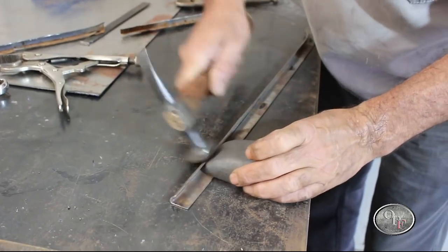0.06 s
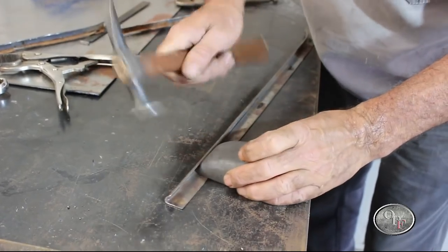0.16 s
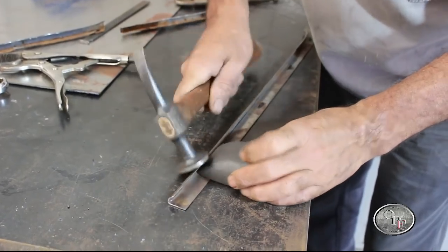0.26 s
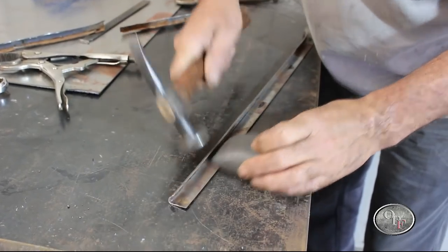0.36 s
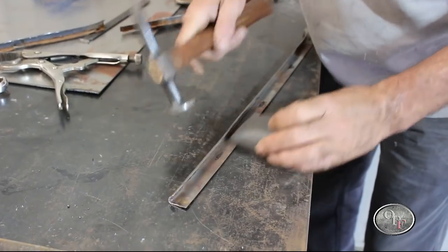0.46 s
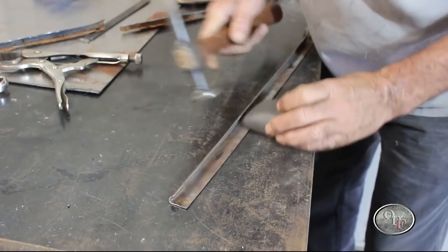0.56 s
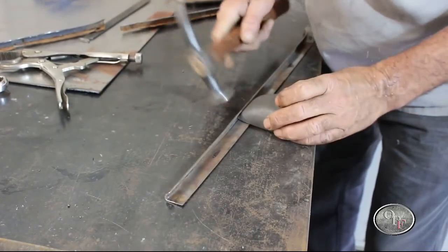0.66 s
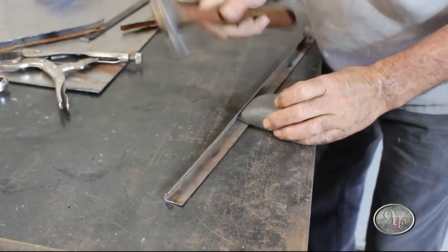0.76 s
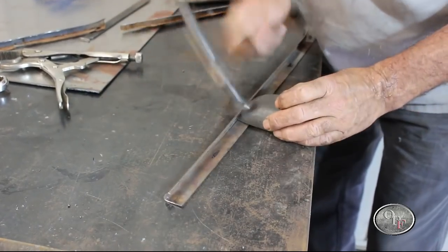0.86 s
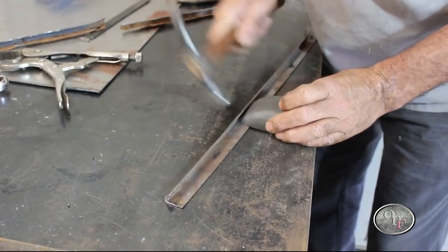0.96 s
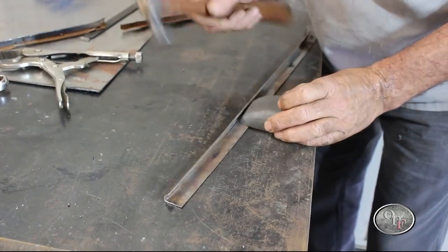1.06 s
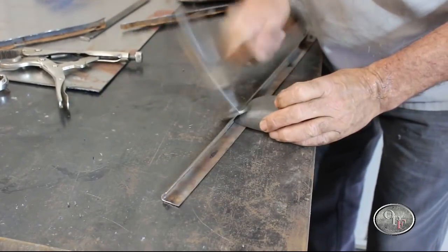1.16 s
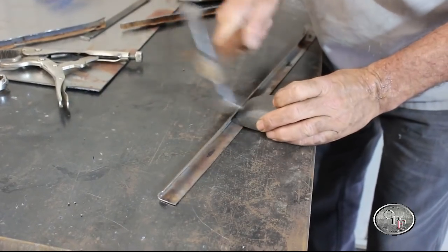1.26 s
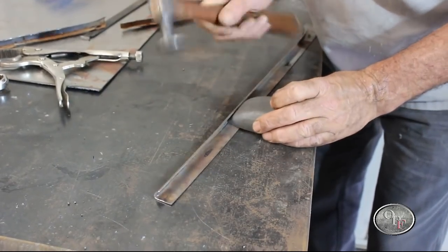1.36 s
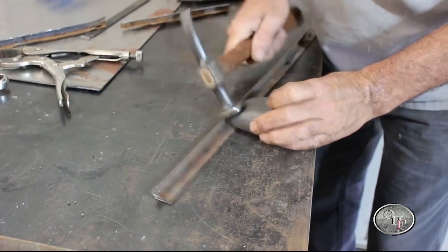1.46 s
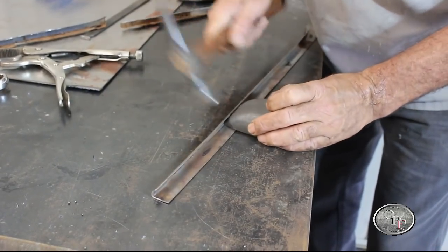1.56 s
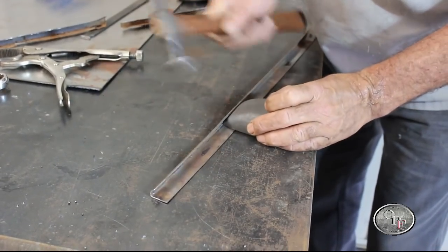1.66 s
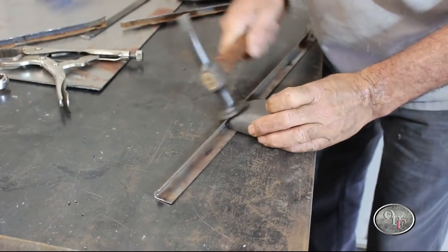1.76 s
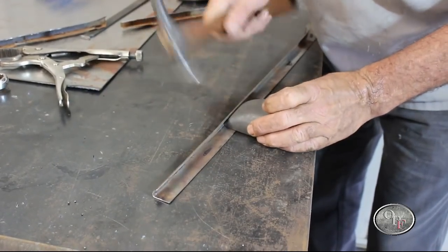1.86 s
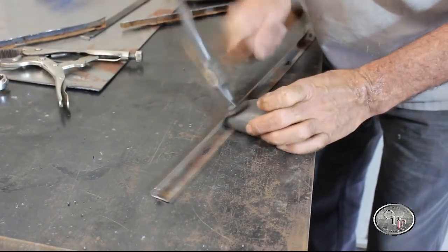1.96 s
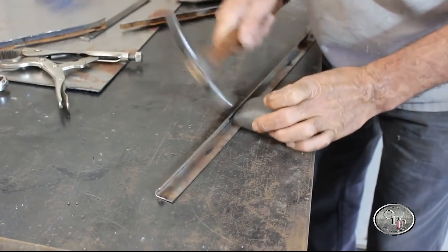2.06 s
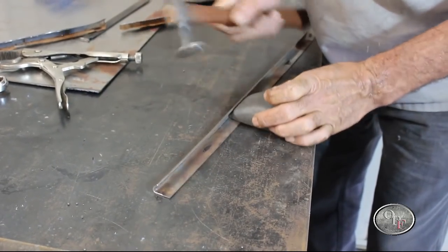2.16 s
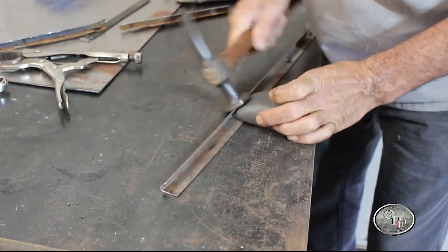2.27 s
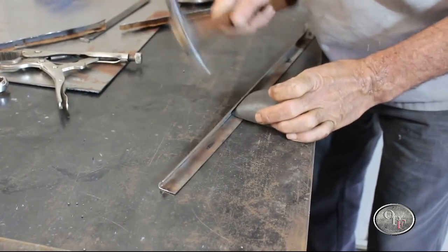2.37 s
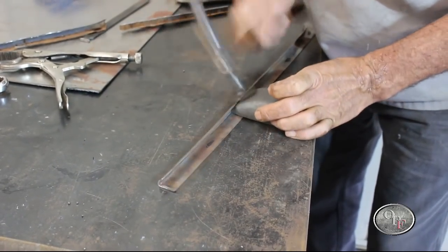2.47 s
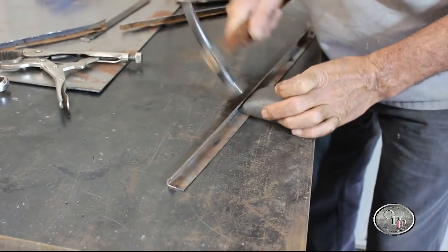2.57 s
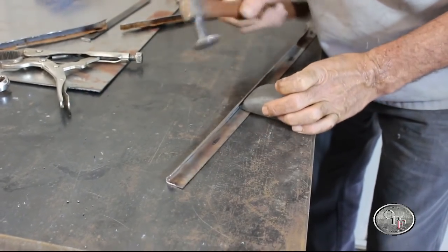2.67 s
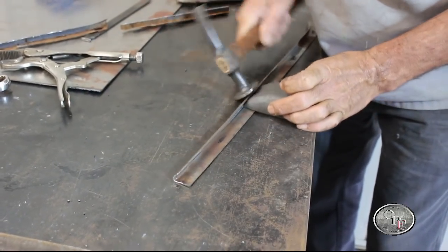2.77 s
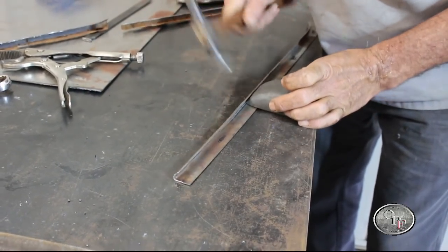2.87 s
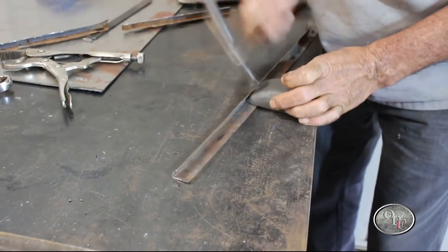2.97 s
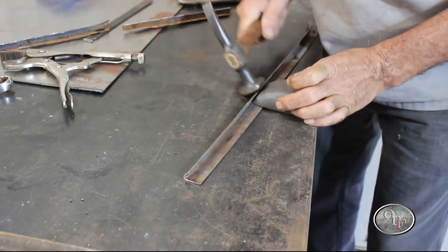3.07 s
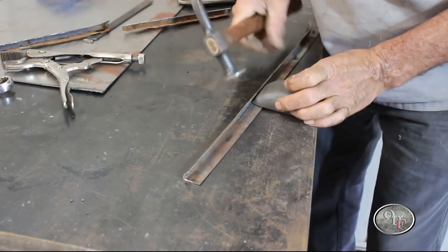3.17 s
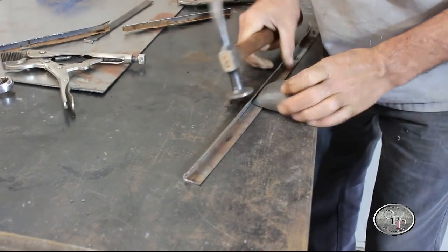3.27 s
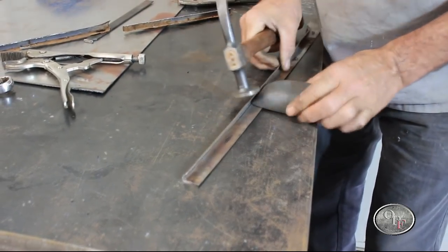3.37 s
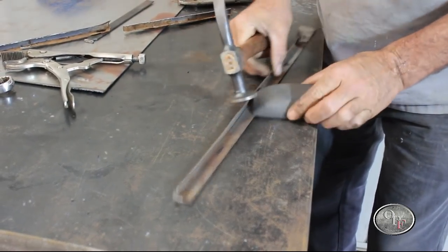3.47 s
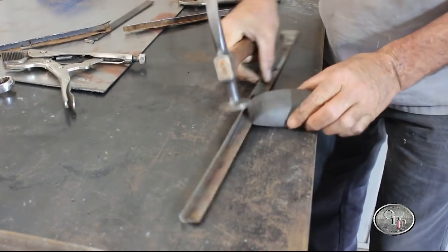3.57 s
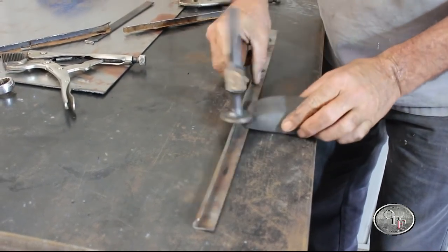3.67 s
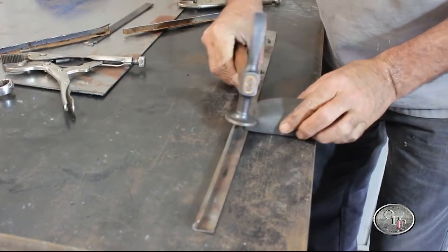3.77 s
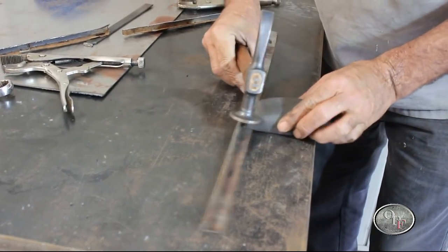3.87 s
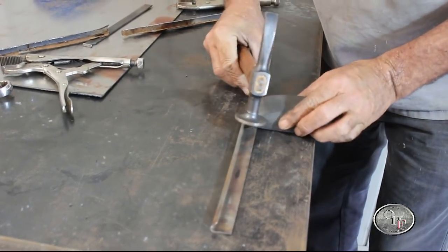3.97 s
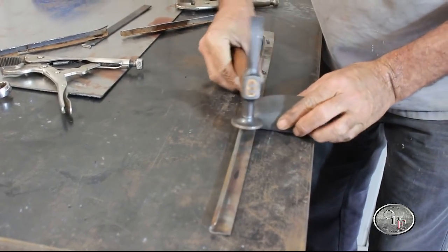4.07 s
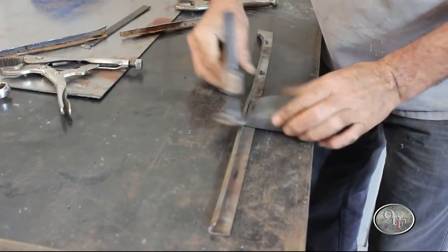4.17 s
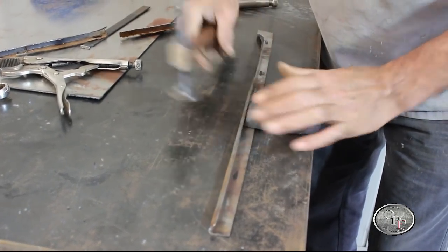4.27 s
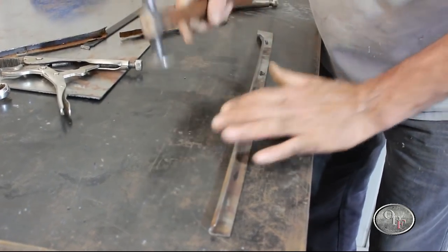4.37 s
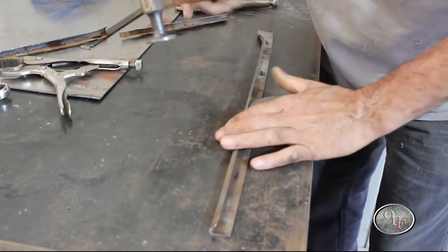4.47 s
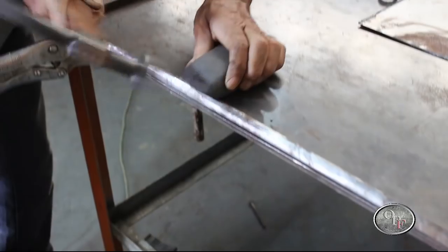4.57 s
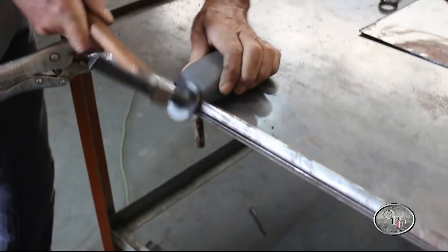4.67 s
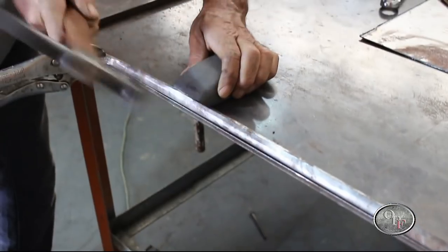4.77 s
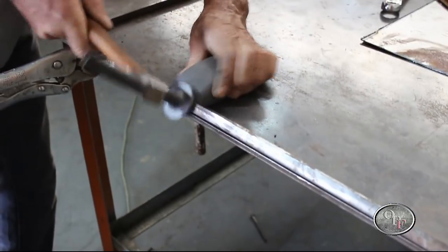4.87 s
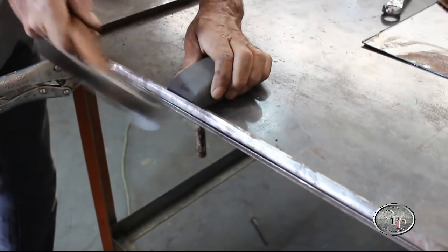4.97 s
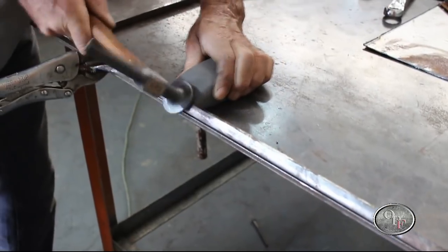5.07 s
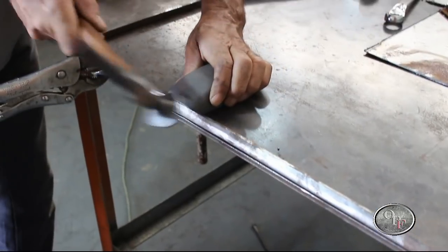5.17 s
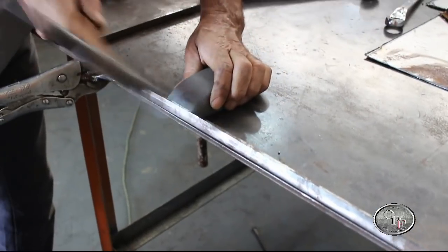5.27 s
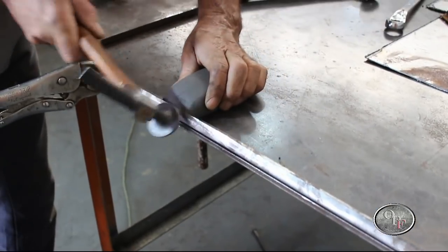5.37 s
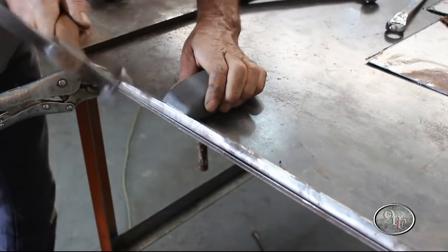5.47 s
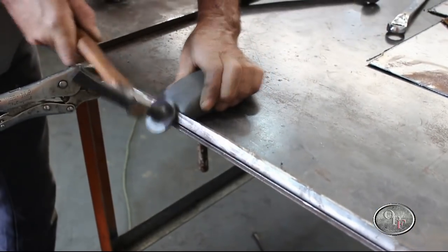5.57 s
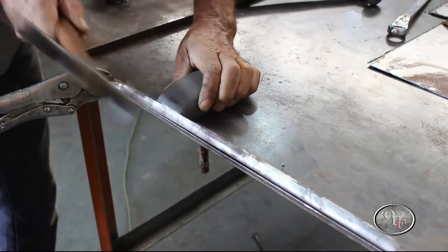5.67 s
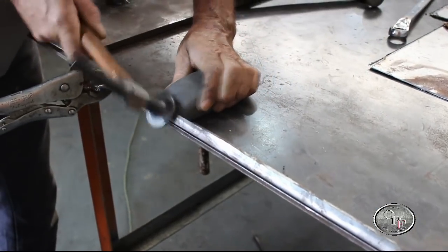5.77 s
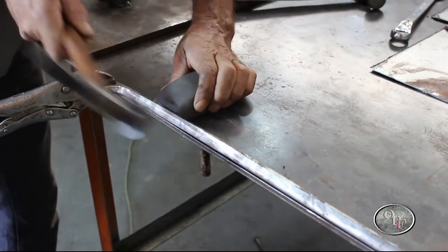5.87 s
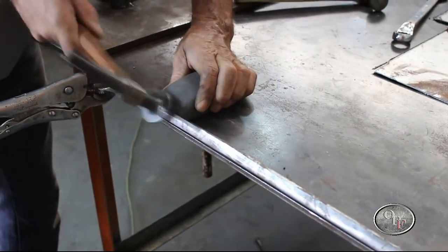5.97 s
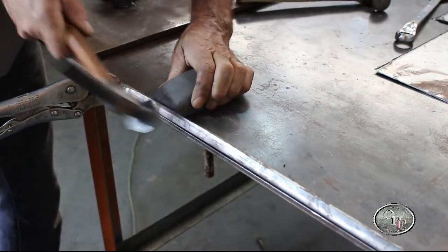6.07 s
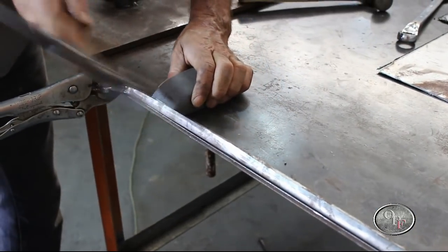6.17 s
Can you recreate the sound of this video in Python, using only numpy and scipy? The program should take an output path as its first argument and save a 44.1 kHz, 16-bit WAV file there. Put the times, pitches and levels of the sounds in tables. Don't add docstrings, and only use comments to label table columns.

```python
import sys
import numpy as np
from scipy import signal
from scipy.fft import rfft, irfft
from scipy.io import wavfile
from scipy.ndimage import uniform_filter1d

SR = 44100
rng = np.random.default_rng(int(sys.argv[2]) if len(sys.argv) > 2 else 0)


def put_to_file(sound):
    columns = np.atleast_2d(sound).T
    safe = np.clip(columns, -1, 1)
    whole_steps = np.round(safe * 32767)
    wavfile.write(sys.argv[1], SR, whole_steps.astype(np.int16))


def volts_from_db(level):
    exponent = np.asarray(level, float) / 20
    return 10 ** exponent


N = 274743
LEAD = SR
LENGTH = N + LEAD
HALL_SIZE = 70000
BAND_EDGES = 45 * 2 ** np.arange(0, 8.6, 1 / 3)
BAND_HZ = np.sqrt(BAND_EDGES[1:] * BAND_EDGES[:-1])

# (frequency [Hz], level per Hz [dB])
FAR_MACHINES = [(20, 8), (50, -0.5), (150, 0.5), (400, 2), (1000, -4.5), (2500, -16), (4000, -11.5),
                (6000, -22), (9000, -45.5), (16000, -66)]
# (frequency [Hz], rms level [dB])
MOTOR_WHINE = [(1334, -61), (1403, -58.5), (2820, -67)]
# (time [s], strength [dB], strongest clang [Hz], crack [dB], weight [dB])
BENCH_BLOWS = [(.064, -0.5, 2770, -16.5, -4.5), (.326, -2, 2960, -17, 3), (.953, 0, 3800, -4, 2),
               (1.248, 2.5, 2100, -39, 1.5), (1.527, -0.5, 3380, -9, -0.5), (1.79, -3.5, 3930, -8, -1),
               (2.0496, 1, 2420, -8, -2.5), (2.296, -2, 2680, -8.5, -1), (2.554, -1.5, 2680, -9.5, -1.7),
               (2.806, -6, 4250, -4.5, 4), (3.056, -4.5, 2800, -7, 1.9)]
# (time [s], strength [dB], strongest clang [Hz], crack [dB])
EDGE_BLOWS = [
    (4.687, -0.3, 3150, -10),
    (4.917, -1.2, 1820, -11),
    (5.141, -0.5, 3200, -7),
    (5.372, -0.4, 2740, -10),
    (5.609, -3.1, 1850, -13.5),
    (5.828, -4.3, 1980, -14),
    (6.05, -1.9, 2820, -11),
]
# (frequency [Hz], level [dB])
STRIP_CLANG = [(300, -19), (700, -18.5), (1300, -1.5), (2500, -1), (4200, -1.5), (6500, -7.5), (9000, -21),
               (12000, -12), (15500, -43)]
# (frequency [Hz], level [dB], T60 [s])
TOOL_MODES = [(2690, -19, 0.1), (3980, 22, 0.11), (4200, -14, .15), (7060, -21.5, .1), (8210, 8.5, 0.27),
              (10300, -4, 0.053), (10400, -5.5, 0.15), (12900, -5, .1), (12660, -14.5, .15),
              (13060, -18.5, .08), (14000, -14, .08)]
# (frequency [Hz], level [dB], T60 [s])
BENCH_MODES = [(85, -16, 0.37), (170.4, -14, 1), (245, -9.5, 0.93), (296.5, 1, 0.52), (365.8, 2, 0.48),
               (561, -22, 0.77), (704, -2.5, 1), (844, 1.5, 1)]
# (frequency [Hz], level per Hz [dB])
WASH_COLOUR = [(60, -21), (120, -15), (250, -8), (600, -8), (1000, -4.5), (1800, 1), (3500, -0.5),
               (5000, -5), (7000, -16), (9000, -35), (12000, -5.5), (14000, -41.5), (16000, -30)]
# (frequency [Hz], T60 [s])
HALL_DECAY = [(60, 1.08), (250, 0.99), (1000, 1.2), (3000, 1.297), (6000, 1.026), (10000, 0.5),
              (16000, 0.79)]
# (frequency [Hz], level [dB])
FIRST_REFLECTIONS = [(100, -2), (1000, 7), (4000, 7.5), (12000, 8)]
# (time [s], ring of the tools [dB], clang of the strip [dB], clang pitch [Hz], rattle length [s])
STEEL_TOUCHES = [(0.672, -34, -50, 3140, 0.022), (1.203, -9, -4.5, 6200, 0.018),
                 (1.483, -19, -34, 6000, 0.017), (3.315, -46, 4, 2440, 0.034), (3.722, -73, -20, 900, .07),
                 (3.778, -54, -15.5, 3160, 0.007), (3.958, -60, -14, 2650, .025),
                 (3.974, -53.5, -13, 4550, 0.0053), (3.988, -70, -17.5, 1240, 0.041),
                 (4.103, -45, -15.5, 1430, 0.028), (4.474, -90, -30, 805, 0.04)]
# (start [s], length [s], level [dB])
WHISTLING_SLIDES = [
    (3.54, 0.098, -56),
    (3.647, 0.056, -55.5),
    (3.722, .025, -60),
]
# (start [s], length [s], level [dB])
HISSING_SLIDES = [
    (3.922, 0.032, -63),
    (3.96, 0.018, -48),
    (4.178, .022, -66),
]
# (start [s], length [s], level [dB])
STRIP_DRAG = [
    (3.958, 0.012, -24),
]
# (frequency [Hz], level [dB], T60 [s])
BLOCK_SQUEAKS = [(9400, -8, 0.092), (10700, -5, .1), (11600, -6, .1), (12600, 3, .15), (13300, -5, .1),
                 (14000, -8, .1)]
# (frequency [Hz], level [dB], T60 [s])
CLINK_MODES = [(2907, -8, .19), (3919, 3, 0.12), (4430, -20, .28), (8000, -24, 0.22), (10950, -21, 0.17),
               (12400, -24, .15)]
# (frequency [Hz], level [dB], T60 [s])
LOOSE_STRIP_MODES = [(1200, -16, 0.11), (2514, -22, 5.0), (2826, -11, 0.9), (4600, 2, 0.056),
                     (5039, -15, 1.0), (5626, -24, 1.8)]


def at_hz(points, hz):
    return np.interp(np.log(hz), np.log(np.array(points)[:, 0]), np.array(points)[:, 1])


def rms_one(x):
    return x / np.sqrt(np.mean(x ** 2) + 1e-20)


def bandpassed(x, order, low_hz, high_hz):
    return signal.sosfilt(signal.butter(order, [low_hz, high_hz], "band", fs=SR, output="sos"), x)


def highpassed(x, order, hz):
    return signal.sosfilt(signal.butter(order, hz, "high", fs=SR, output="sos"), x)


def dying(size, length_s, steepness_db):
    return volts_from_db(-np.arange(size) / SR / length_s * steepness_db)


def add(track, s, sound):
    i = LEAD + int(round(s * SR))
    track[i:i + len(sound)] += sound[:LENGTH - i]


def coloured(spectrum, size):
    hz = np.maximum(np.fft.rfftfreq(size, 1 / SR), 1)
    return rms_one(irfft(rfft(rng.standard_normal(size)) * volts_from_db(at_hz(spectrum, hz)), size))


def background():
    t = np.arange(LENGTH) / SR
    whine = sum(volts_from_db(db + 2) * np.sin(2 * np.pi * hz * t) for hz, db in MOTOR_WHINE)
    return volts_from_db(-48) * coloured(FAR_MACHINES, LENGTH) + whine


def hall_bands(far_wall_s, far_wall_db):
    t = np.arange(HALL_SIZE) / SR
    white = rng.standard_normal((2, 2 * HALL_SIZE))
    noise = [bandpassed(white[k % 2], 2, low, high)
             for k, (low, high) in enumerate(zip(BAND_EDGES, BAND_EDGES[1:]))]
    swell = far_wall_db / (1 + np.exp(-(t - far_wall_s) / 0.008))
    early = np.outer(at_hz(FIRST_REFLECTIONS, BAND_HZ), np.exp(-t / 0.094))
    fall_db = 60 * np.outer(1 / at_hz(HALL_DECAY, BAND_HZ), t)
    decay = volts_from_db(swell + early - fall_db) * (1 - np.exp(-t / 0.0054))
    return np.array(noise, np.float32), decay.astype(np.float32)


def wash(hall, colour_db):
    noise, decay = hall
    start = rng.integers(0, HALL_SIZE)
    return volts_from_db(colour_db).astype(np.float32) @ (noise[:, start:start + HALL_SIZE] * decay)


def echoed(tail, source):
    size = 2 ** 17
    level = np.log(np.abs(rfft(source, size)) + 1e-4)
    prominence = 0.14
    lines = np.exp(prominence * (level - uniform_filter1d(level, size=2400)))
    return irfft(rfft(tail, size) * lines / np.sqrt(np.mean(lines ** 2)), size)[:len(tail)]


def with_earlier(blows, pace_s, strength_db, count):
    first_s, weight_db = blows[0][0], blows[0][4]
    usual_clang_hz, usual_crack_db = 2620, -15.5
    earlier = [(first_s - k * pace_s, strength_db, usual_clang_hz, usual_crack_db, weight_db)
               for k in range(count, 0, -1)]
    return earlier + blows


def rings(hz, gain, t60, size):
    t = np.arange(size) / SR
    return gain @ (np.sin(2 * np.pi * np.outer(hz, t)) * volts_from_db(-60 * np.outer(1 / t60, t)))


def struck(modes, spread_db, damping):
    hz, level_db, t60 = np.transpose(modes)
    return rings(hz, volts_from_db(level_db + spread_db * rng.standard_normal(len(hz))), t60 * damping, size=24000)


def clang(peak_hz, spread_db, t60_at_2k, dull_db):
    count = 110
    hz = np.geomspace(400, 15500, count) * np.exp(0.0211 * rng.standard_normal(count))
    near_db = 10.9 * np.exp(-(np.log(hz / peak_hz) / 0.18) ** 2)
    near_db -= dull_db * np.maximum(np.log2(hz / peak_hz), 0)
    level_db = at_hz(STRIP_CLANG, hz) + near_db + spread_db * rng.standard_normal(count)
    gain = volts_from_db(level_db) * np.sqrt(hz / 2000) * rng.choice([-1, 1], count)
    sound = rings(hz, gain, t60_at_2k * (2000 / hz) ** 0.6, size=6000)
    return sound / np.abs(sound).max()


def crack(length_s):
    return highpassed(rng.standard_normal(3000) * dying(3000, length_s, 20), 2, 7500)


def chatter(length_s):
    ticks = rng.standard_normal(5000) * (rng.random(5000) < 0.012) * dying(5000, length_s, 13.5)
    bright = bandpassed(crack(0.0085)[:800], 2, 9500, 13800)
    return np.concatenate([np.zeros(400), signal.fftconvolve(ticks, bright)])


def blow_colour(peak_hz, crack_db, weight_db, body_db):
    darkness = 0.3 * weight_db - 0.09 * (crack_db + 10.5)
    tilt = -darkness * np.tanh(np.log2(BAND_HZ / 2500)) * np.clip(np.log2(BAND_HZ / 450), 0, 1)
    bump = 1.1 * np.exp(-(np.log(BAND_HZ / peak_hz) / 0.24) ** 2)
    bump += 0.45 * rng.standard_normal(len(BAND_HZ))
    body = body_db * np.exp(-(np.log(BAND_HZ / 620) / 0.74) ** 2)
    treble = 0.19 * (crack_db + 12.5) * np.clip(np.log2(BAND_HZ / 4000), 0, 1)
    return at_hz(WASH_COLOUR, BAND_HZ) + tilt + bump + treble + body


def hammer(blows, hall, wash_db, direct_db, ring_db, thump_db, chatter_db, clang_t60, body_db):
    out = np.zeros(LENGTH)
    for s, strength_db, peak_hz, crack_db, weight_db in blows:
        blow = volts_from_db(1.4 * weight_db + thump_db) * struck(BENCH_MODES, 2.5, 0.099)
        blow += volts_from_db(-39.5) * struck(TOOL_MODES, 3.0, 0.54)
        strip = clang(peak_hz, 2.1, clang_t60, dull_db=-3.5)
        blow[:6000] += strip
        blow[:3000] += volts_from_db(crack_db + 2) * crack(0.0063)
        add(out, s, volts_from_db(chatter_db + 0.5 * crack_db) * chatter(0.054))
        bench = struck(BENCH_MODES, 2.5, 1.3)
        add(out, s, volts_from_db(direct_db + 0.55 * strength_db) * blow + volts_from_db(ring_db) * bench)
        tail = wash(hall, blow_colour(peak_hz, crack_db, weight_db, body_db))
        add(out, s, volts_from_db(wash_db + strength_db) * echoed(tail, strip))
    return out


def touches(hall):
    out = np.zeros(LENGTH)
    for s, tools_db, clang_db, peak_hz, rattle_s in STEEL_TOUCHES:
        ring_db = tools_db - 4 - 2000 * rattle_s
        sound = volts_from_db(ring_db) * struck(TOOL_MODES, 2.8, 0.86)
        sound += volts_from_db(clang_db - 43.5) * struck(BENCH_MODES, 5.4, 0.33)
        sound[:6000] += volts_from_db(clang_db) * clang(peak_hz, 0.87, 0.026, dull_db=11)
        sound[:3000] += volts_from_db(tools_db) * crack(0.0058)
        contacts = rng.standard_normal(4000) * (rng.random(4000) < 0.08) * dying(4000, rattle_s, 8.5)
        contacts[0] = 0.54 * volts_from_db(0.35 * clang_db) * np.sqrt(np.sum(contacts ** 2) + 1)
        add(out, s, signal.fftconvolve(sound, contacts / np.sqrt(np.sum(contacts ** 2))))
        octaves = np.log2(BAND_HZ / peak_hz)
        dull = 11 * np.maximum(octaves, 0) + 1.0 * np.maximum(-octaves, 0)
        add(out, s, volts_from_db(clang_db - 16) * wash(hall, at_hz(WASH_COLOUR, BAND_HZ) - dull))
    return out


def stroke(rows, release_db_per_s):
    t = (np.arange(LENGTH) - LEAD) / SR
    gain = np.zeros(LENGTH)
    for s, length, db in rows:
        grip_db = 900 * np.maximum(s - t, 0)
        let_go_db = release_db_per_s * np.maximum(t - s - length, 0)
        gain += volts_from_db(db - np.minimum(grip_db + let_go_db, 200))
    return gain


def squeak(grit, damping):
    flicker_db, flicker_s = 9, 0.03
    steps = np.arange(LENGTH) / SR / flicker_s
    out = np.zeros(LENGTH)
    for hz, level_db, t60 in BLOCK_SQUEAKS:
        flicker = np.interp(steps, np.arange(400), rng.standard_normal(400))
        ring = rings(np.array([hz]), volts_from_db(np.array([level_db])), np.array([t60 * damping]), size=3000)
        out += volts_from_db(flicker_db * flicker) * signal.fftconvolve(grit, ring)[:LENGTH]
    return rms_one(out)


def slides():
    grit = rng.standard_normal(LENGTH) * volts_from_db(1.5 * rng.exponential(1, LENGTH))
    grit *= rng.random(LENGTH) < 6000 / SR
    rasp = rms_one(signal.fftconvolve(grit, clang(2720, 1.7, 0.0028, dull_db=8))[:LENGTH])
    hiss = rms_one(bandpassed(grit, 3, 9500, 14500))
    whistles = stroke(WHISTLING_SLIDES, 1198) * (squeak(grit, damping=0.2) + 0.4 * hiss)
    hisses = stroke(HISSING_SLIDES, 1198) * (0.76 * squeak(grit, damping=0.04) + 0.7 * hiss)
    drag = stroke(STRIP_DRAG, 158) * volts_from_db(-6.5) * rasp
    return drag + whistles + hisses


def loose_rings():
    out = np.zeros(LENGTH)
    for s, db, modes in ((3.781, -32, CLINK_MODES), (3.977, -21.5, LOOSE_STRIP_MODES)):
        hz, level_db, t60 = np.transpose(modes)
        gain = volts_from_db(db + level_db - level_db.max())
        add(out, s, rings(hz, gain, np.minimum(t60, 0.4), size=24000))
    return out


def gain_control(x, threshold_db, firmness, attack_s, release_db_per_s):
    fast, slow = np.exp(-1 / (0.011 * SR)), np.exp(-1 / (attack_s * SR))
    level = 10 * np.log10(signal.lfilter([1 - fast], [1, -fast], x ** 2) + 1e-12)
    ramp = release_db_per_s * np.arange(LENGTH) / SR
    held = np.maximum.accumulate(level + ramp) - ramp
    cut = np.clip(firmness, 0, 1) * np.maximum(held - threshold_db, 0)
    return x * volts_from_db(-signal.lfilter([1 - slow], [1, -slow], cut))


def scene():
    air = background()
    hall = hall_bands(far_wall_s=0.095, far_wall_db=1.5)
    blows = with_earlier(BENCH_BLOWS, pace_s=0.262, strength_db=-1.2, count=2)
    near = hammer(blows, hall, wash_db=-4, direct_db=4.5, ring_db=-38, thump_db=-33.5, chatter_db=-9.5,
                  clang_t60=0.044, body_db=-0.06)
    near += touches(hall) + slides() + loose_rings() + air

    hall = hall_bands(far_wall_s=0.108, far_wall_db=4)
    weighted = [row + (0.2,) for row in EDGE_BLOWS]
    blows = with_earlier(weighted, pace_s=0.228, strength_db=0.1, count=3)
    edge = hammer(blows, hall, wash_db=0.41, direct_db=10.5, ring_db=-29.5, thump_db=-70, chatter_db=-29,
                  clang_t60=0.12, body_db=-2)
    edge += air

    near, edge = (gain_control(x, threshold_db=-17.0, firmness=0.93, attack_s=0.013,
                               release_db_per_s=92.8)[LEAD:] for x in (near, edge))
    change_s, fade_s = 4.593, 0.0049
    fade = np.clip((np.arange(N) / SR - change_s) / fade_s, 0, 1)
    return np.tile((1 - fade) * near + fade * edge, (2, 1))


def roll_off(x):
    return signal.sosfilt(signal.butter(12, 16380, fs=SR, output="sos"), x)


def record(dry):
    hiss = volts_from_db(-74) * highpassed(rng.standard_normal(N), 2, 7000)
    overloaded = np.clip(highpassed(dry + hiss, 2, 85), -1, 1)
    coupled = highpassed(overloaded, 1, 45)
    top_cut = signal.butter(6, 14300, fs=SR, output="sos")
    mix = np.clip(1.023 * signal.sosfilt(top_cut, coupled), -1, 1)
    return roll_off(mix)


dry = scene()
out = record(dry)
put_to_file(out)
```